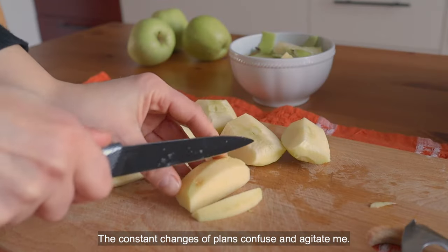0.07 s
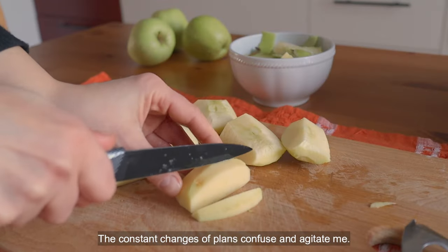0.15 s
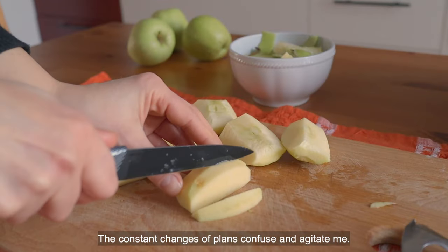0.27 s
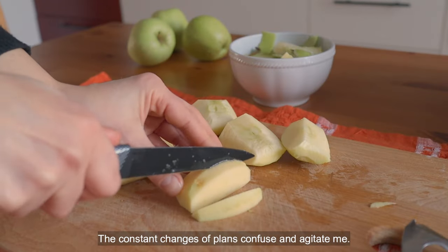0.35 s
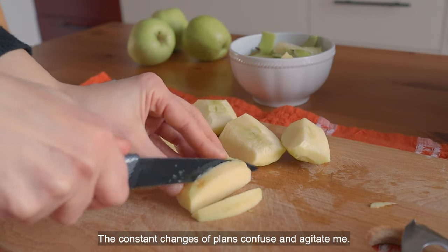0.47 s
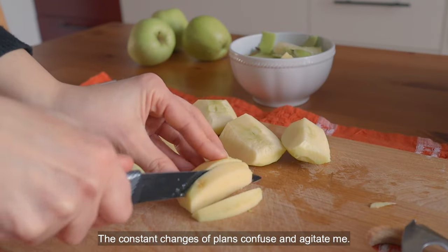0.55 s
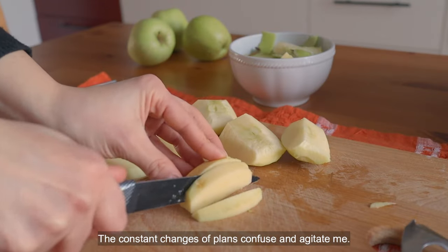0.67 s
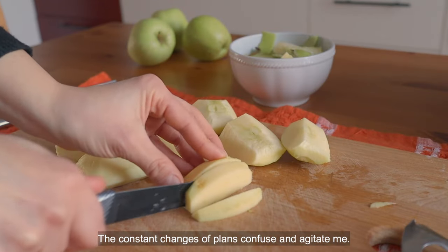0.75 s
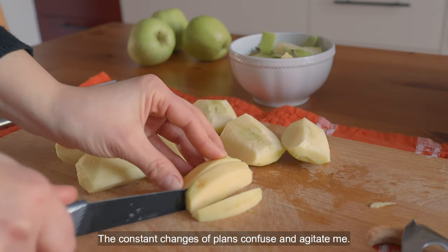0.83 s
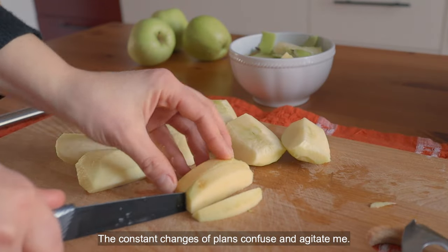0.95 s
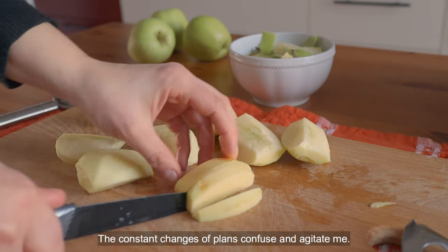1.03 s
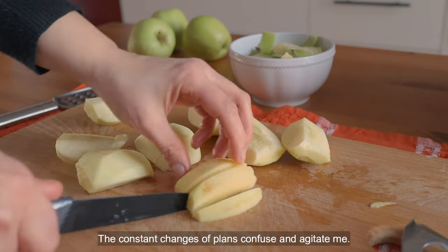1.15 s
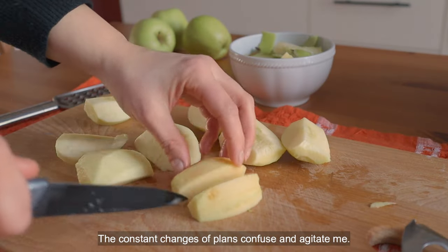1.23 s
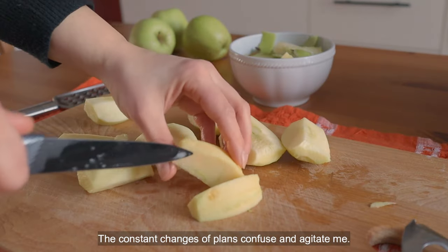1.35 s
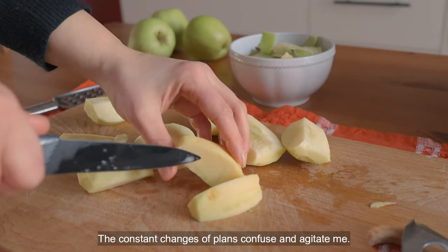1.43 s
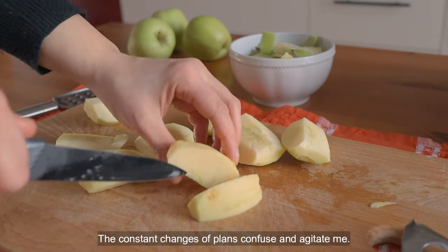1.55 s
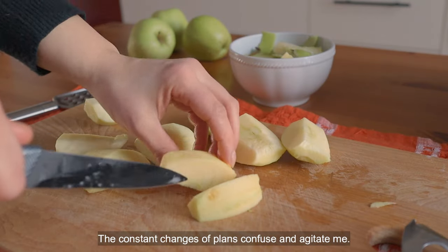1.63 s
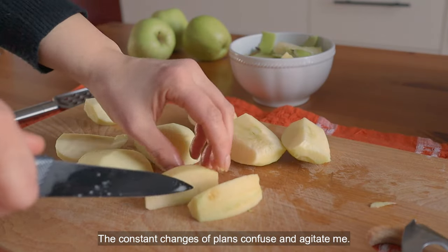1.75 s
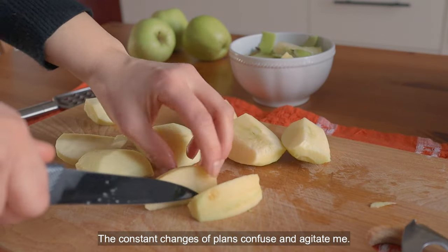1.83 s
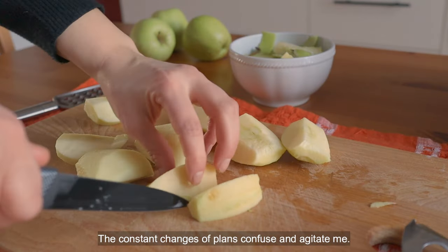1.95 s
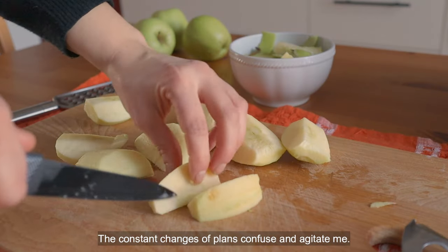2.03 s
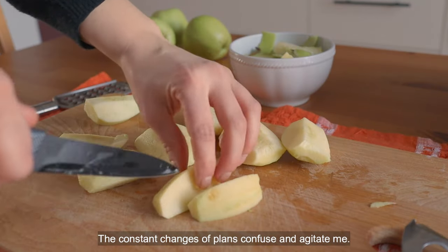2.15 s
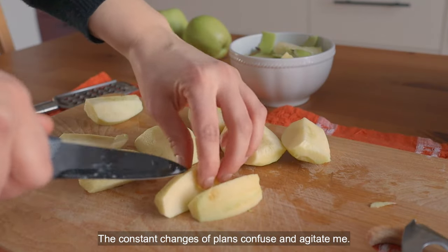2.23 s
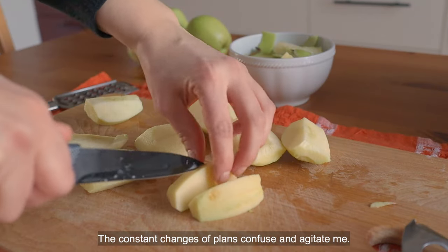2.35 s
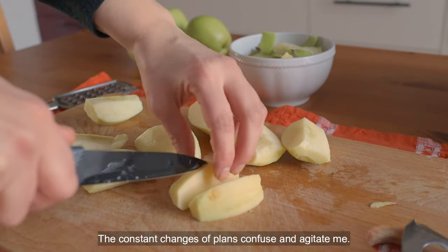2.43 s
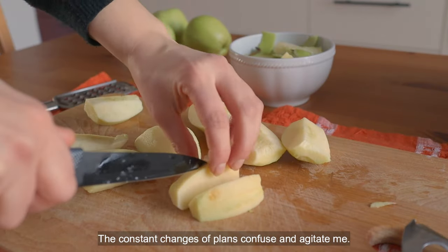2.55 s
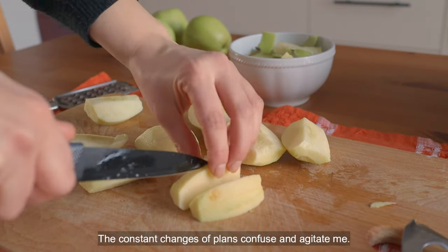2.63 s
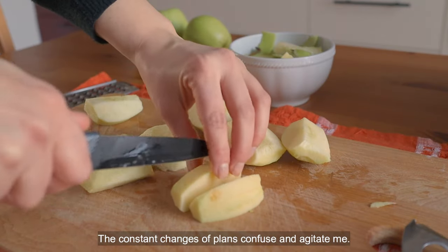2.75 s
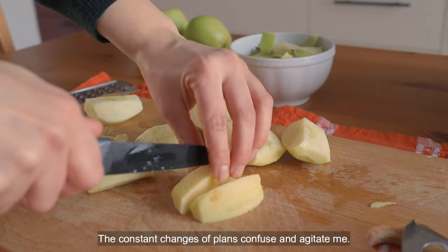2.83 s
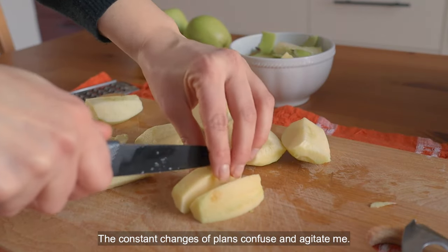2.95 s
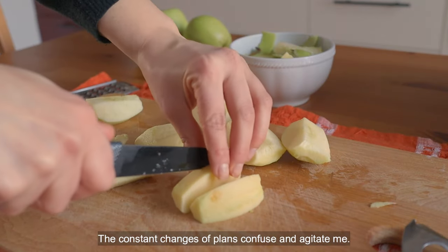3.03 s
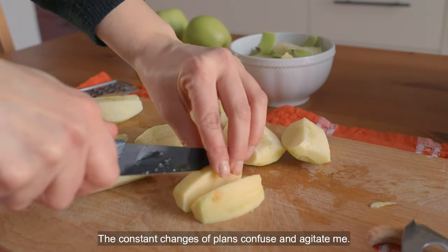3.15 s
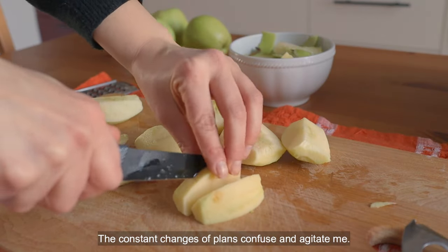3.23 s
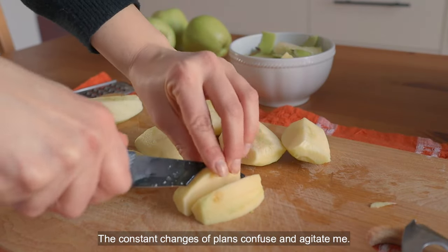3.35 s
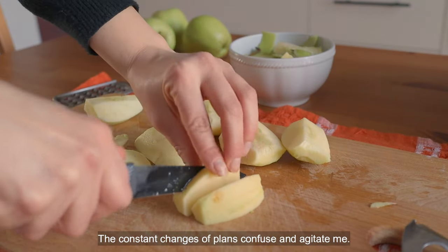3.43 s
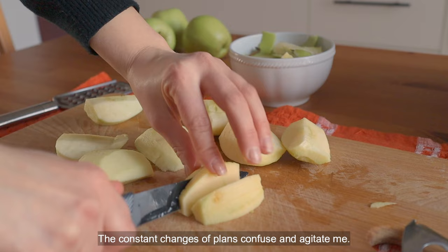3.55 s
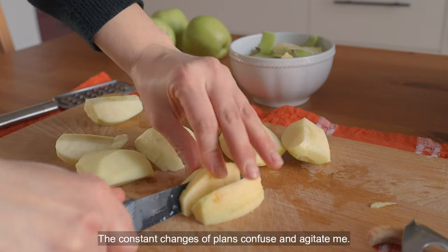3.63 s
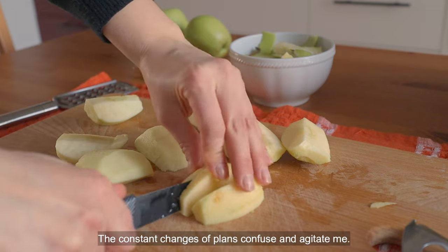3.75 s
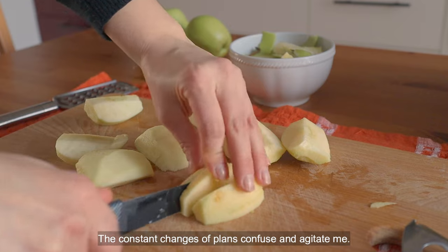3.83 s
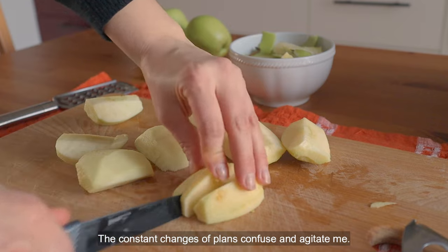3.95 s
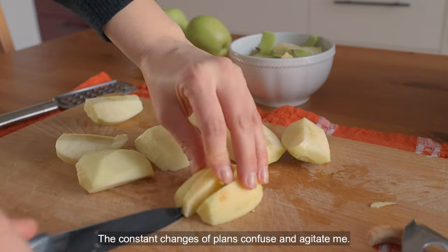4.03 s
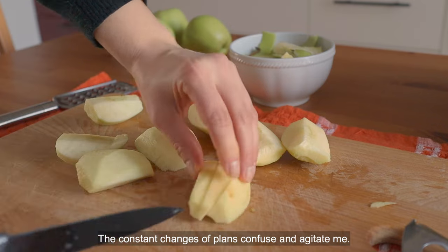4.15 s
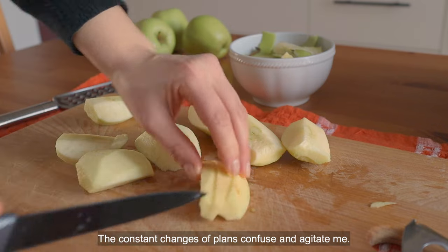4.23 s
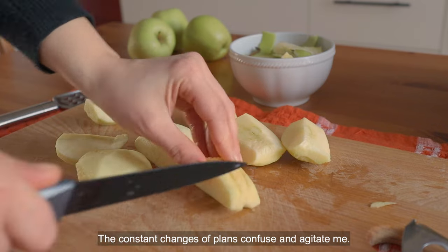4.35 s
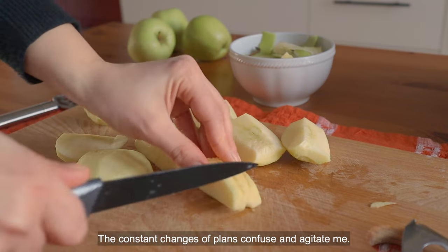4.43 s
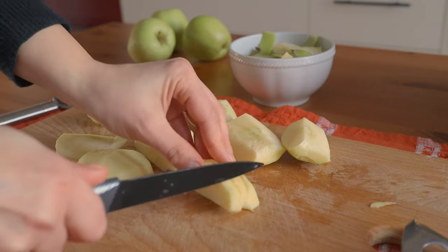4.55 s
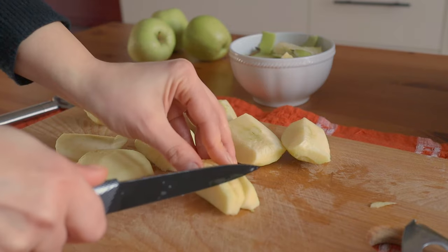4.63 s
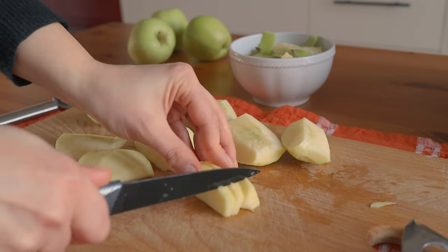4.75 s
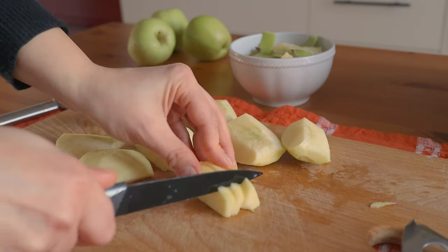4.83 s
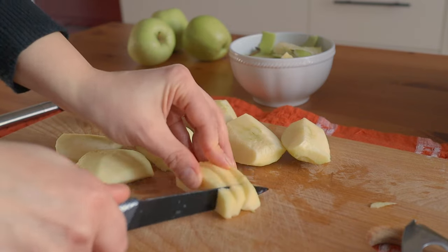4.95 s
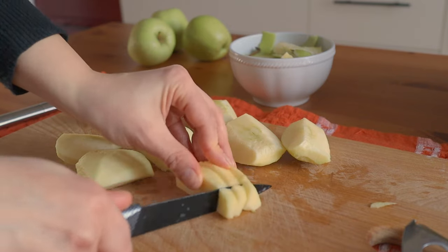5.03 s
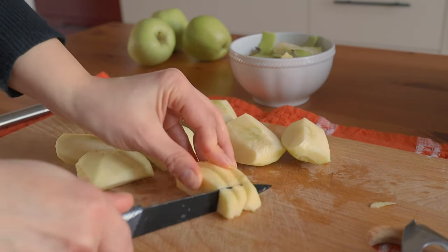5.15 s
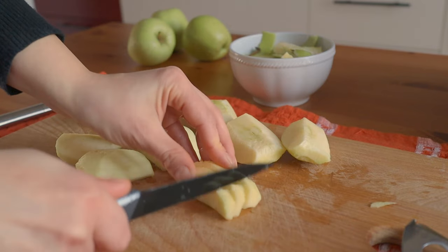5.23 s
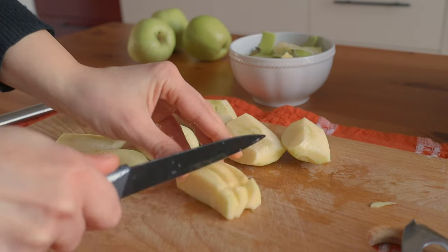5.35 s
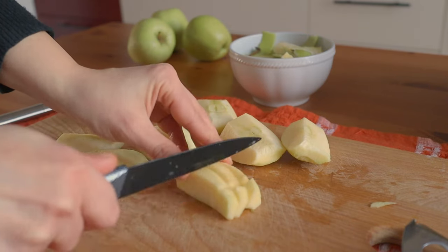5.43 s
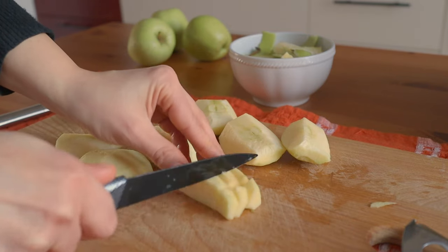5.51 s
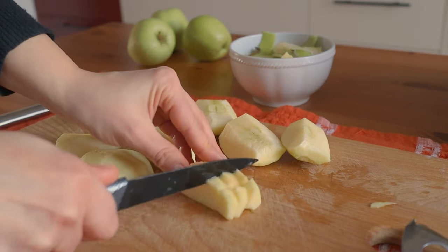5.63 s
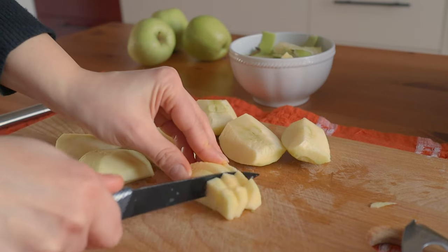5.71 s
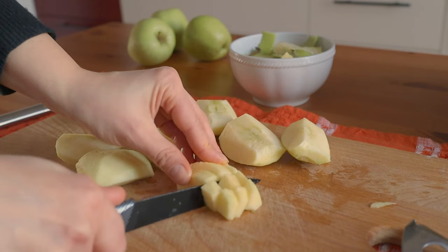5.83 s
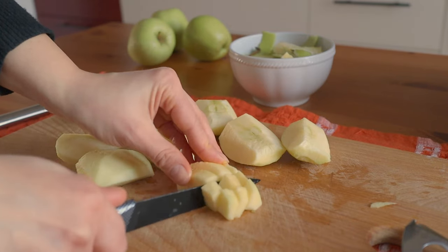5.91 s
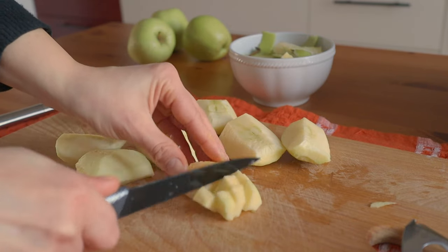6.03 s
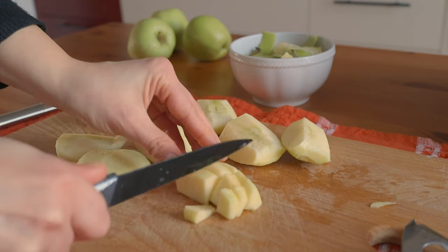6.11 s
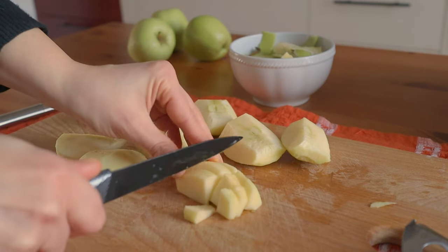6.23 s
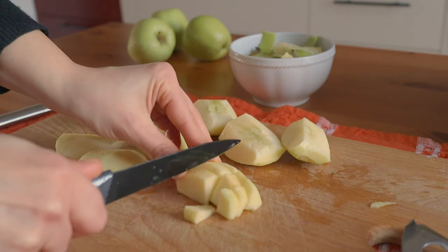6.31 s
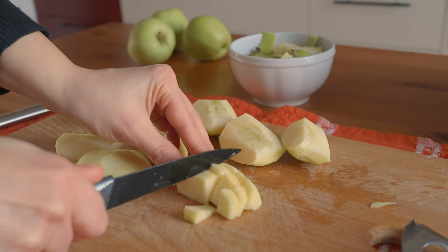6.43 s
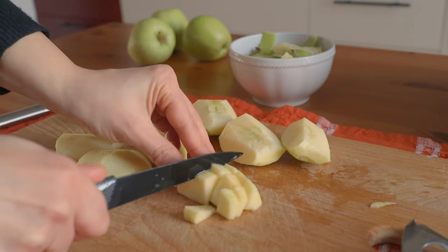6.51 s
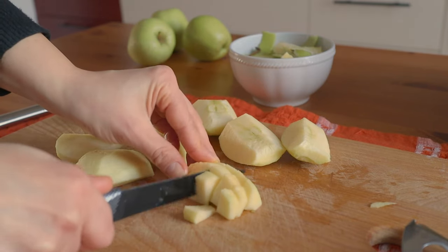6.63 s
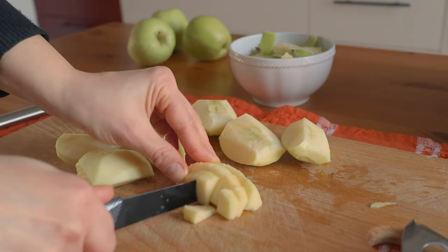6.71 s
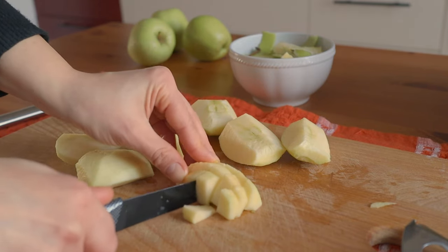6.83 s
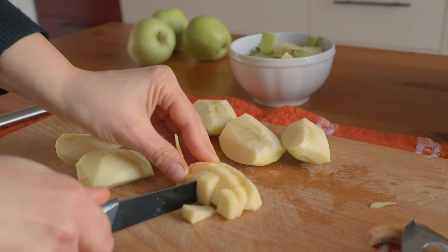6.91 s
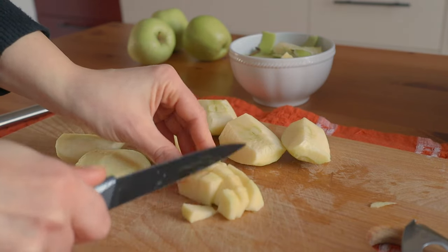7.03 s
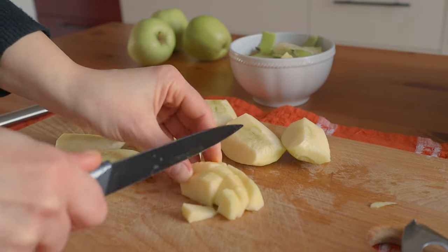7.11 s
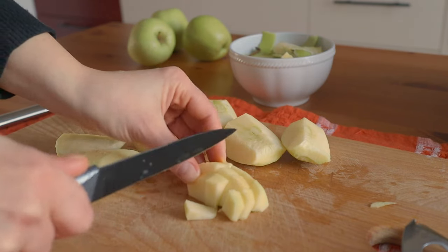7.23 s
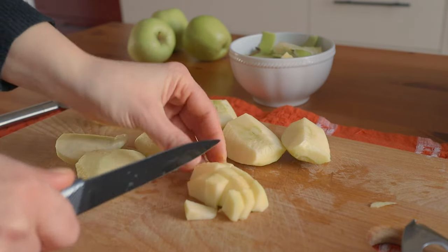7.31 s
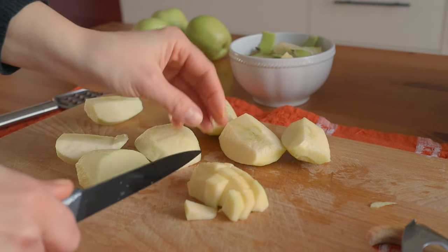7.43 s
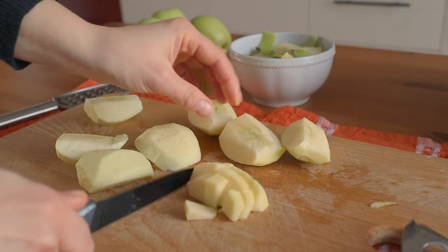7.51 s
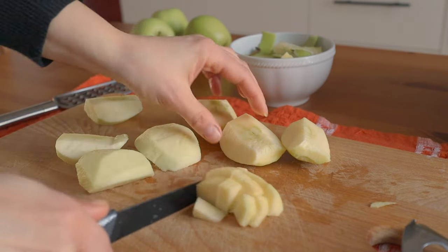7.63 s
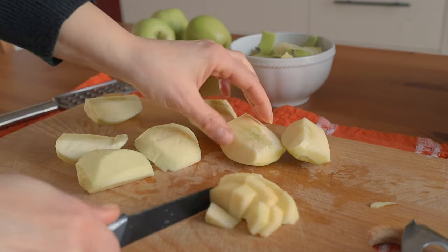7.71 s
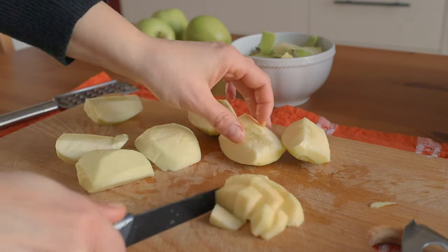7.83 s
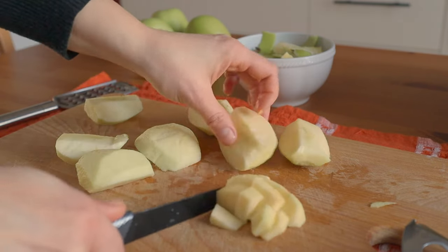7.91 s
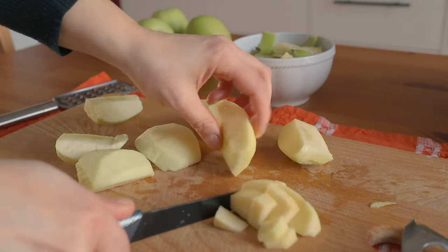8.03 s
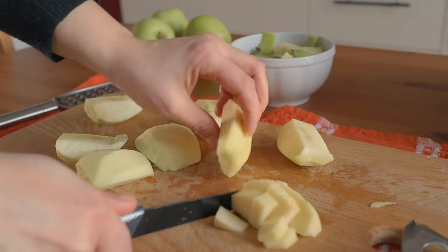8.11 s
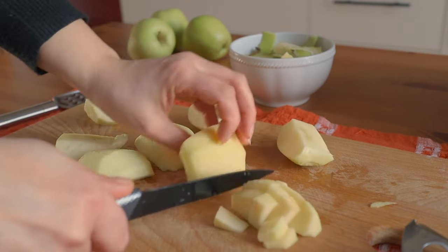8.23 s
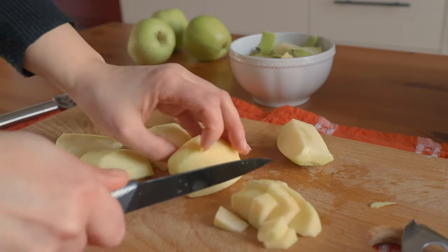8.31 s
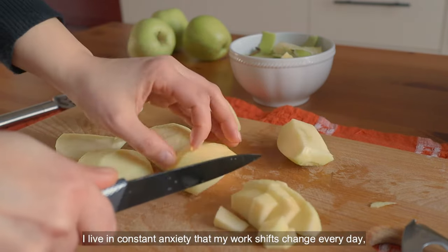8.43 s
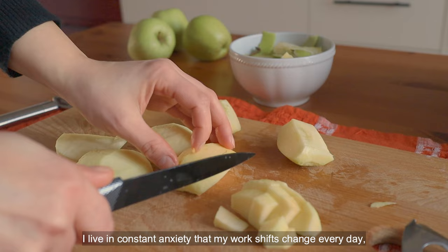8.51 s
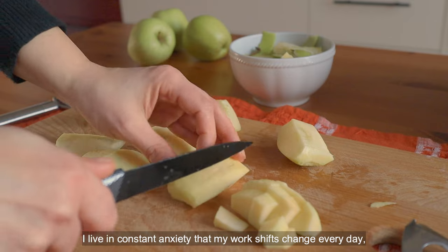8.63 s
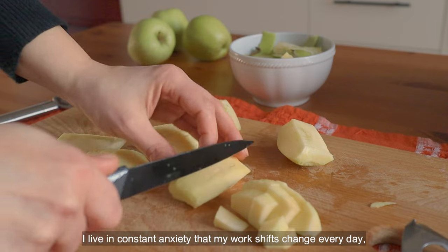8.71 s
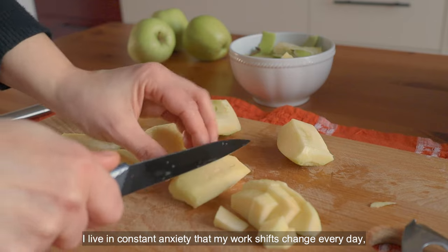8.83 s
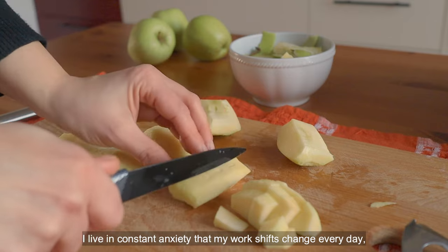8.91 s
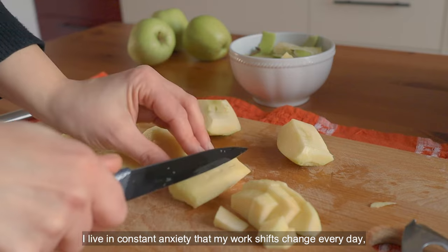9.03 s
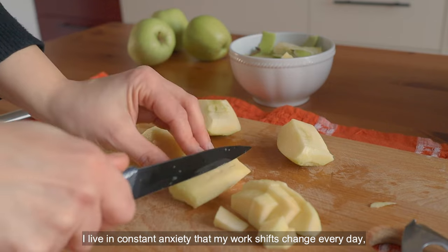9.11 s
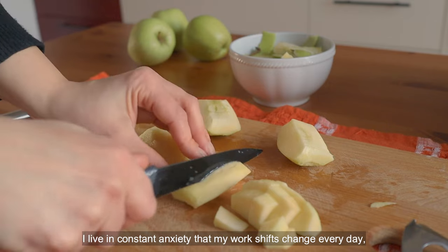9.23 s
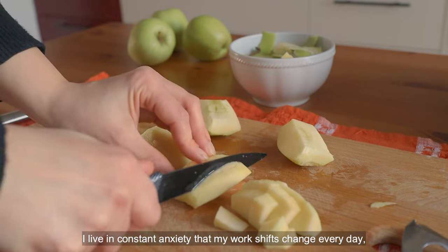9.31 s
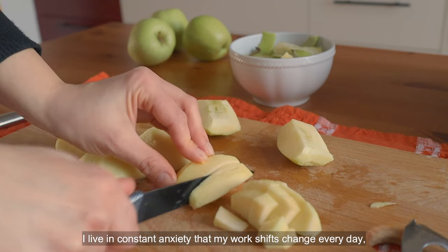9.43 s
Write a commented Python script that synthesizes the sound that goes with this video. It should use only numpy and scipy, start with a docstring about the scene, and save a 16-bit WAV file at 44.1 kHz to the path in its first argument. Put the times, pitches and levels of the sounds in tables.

```python
"""A kitchen knife slices apple on a wooden board in a bare, ringing kitchen, over a low hum and a thin whine.
Noise bursts in shaped strokes hiss through wet flesh, and a first chop, a pulse plus board modes, cracks early.
Fruit ticks, squeaks and knocks as a hand moves it; then three loud chops overload the recorder and duck its gain.
A softer chop follows, pieces are set down, and a last stroke hisses at the end."""
import sys
import numpy as np
from scipy import signal
from scipy.fft import rfft, irfft, next_fast_len
from scipy.io import wavfile
from scipy.ndimage import uniform_filter1d

SR = 44100
rng = np.random.default_rng(int(sys.argv[2]) if len(sys.argv) > 2 else 0)


def wav_record(signal):
    """Record a signal, one row per channel, as 16-bit PCM in the file named by sys.argv[1]."""
    frames = np.transpose(np.atleast_2d(signal))
    bounded = np.clip(frames, -1, 1)
    # unit amplitude maps onto the largest positive 16-bit level
    quanta = np.round(bounded * 32767).astype(np.int16)
    wavfile.write(sys.argv[1], SR, quanta)


N = 417186

# Reverberation of the kitchen: (frequency [Hz], t60 [s])
KITCHEN_DECAY = [(150, 0.92), (400, 0.8), (1000, 0.66), (2500, 0.72), (5000, 0.59), (9000, 0.58),
                 (15000, 0.047)]

# Spectrum of the steady air: (frequency [Hz], relative level [dB])
HUM_SPECTRUM = [(15, -46), (25, -72), (70, 0), (145, -4.5), (229, -0.5), (394, -10), (545, -5.5),
                (607, -14.5), (796, -12.5), (1890, -22.5), (3920, -25), (4250, -16), (4740, -24),
                (12900, -32.5), (16000, -33)]
HUM_DB = -56  # rms
# Humming bands: (frequency [Hz], width [Hz], rms level [dB])
HUM_BANDS = [(232, 63, -62), (293.7, 70, -64.5), (543, 19, -68), (836, 44, -72.5)]
WHINE_HZ, WHINE_DB = 4263, -69.5

# The table sways under the hands: (peak time [s], peak level [dB])
SWAYS = [(.6, -49.5), (1.88, -53.5), (3.32, -48.5), (3.76, -48.5), (5.08, -51.5), (5.9, -48.5), (6.8, -48),
         (8.07, -52.5), (8.441, -49), (8.59, -48.5), (9.42, -54.5)]
SWAY_REST_DB, SWAY_RISE_DB_PER_S, SWAY_FALL_DB_PER_S = -64.5, 70, 75

# Hands jolt the table: (time [s], level before rise and decay [dB], frequency [Hz])
THUDS = [(1.849, -36.5, 121), (3.715, -28, 98), (8.049, -31, 87.4), (8.319, -32.5, 94.6), (8.389, -29, 115)]

# A thin squeak: (start [s], length [s], start pitch [Hz], held pitch [Hz], settling time [s], peak level [dB])
WHISTLE = (4.32, .29, 5300, 5560, .06, -70.5)
# Wet squeaks and scuffs: (start [s], length [s], start pitch [Hz], end pitch [Hz], width [Hz], peak level [dB])
SQUEAKS = [(0.45, 0.21, 2495, 3380, 500, -53), (1.1, 0.37, 2790, 2720, 700, -64.5),
           (3.501, 0.19, 4010, 3740, 432, -52), (3.565, 0.19, 1700, 1800, 800, -53),
           (3.977, 0.24, 2190, 2046, 380, -51), (4.017, 0.182, 3750, 3670, 200, -58.5),
           (7.92, 0.055, 1300, 1300, 200, -50), (8.685, 0.096, 2050, 1980, 301, -59),
           (7.702, 0.17, 3300, 3220, 600, -54), (7.708, 0.18, 1400, 1295, 300, -52),
           (8.04, 0.17, 1350, 1305, 420, -52.5)]

# Wet flesh snaps or unsticks: (time [s], peak level [dB], pitch [Hz])
TICKS = [(0.247, -40, 2320), (0.388, -34.5, 2460), (0.408, -38, 2640), (1.298, -44, 2500),
         (1.351, -44.5, 900), (2.9463, -42, 2590), (3.1247, -42, 2710), (3.2936, -35, 2750),
         (3.8663, -42, 1890), (4.0057, -34.5, 2250), (4.452, -45, 1610), (4.5902, -40.5, 2470),
         (4.789, -47, 4350), (5.6126, -31.5, 3480), (5.667, -43.5, 2780), (6.4573, -36.5, 2514),
         (6.486, -41.5, 1735), (7.225, -47.5, 3276), (7.9232, -43, 1550), (8.332, -43, 2780),
         (8.3868, -40.5, 1616), (8.535, -45, 2600), (8.5557, -41, 1813), (8.835, -50, 2510),
         (9.0126, -37.5, 3160)]
TICK_SPREAD = 1.7  # the grit reaches this factor below and above its pitch
TICK_T60_S, TICK_SNAP_DB, TICK_RISE_S = 0.03, -12, 0.0014

# Spectrum of rubbed wet flesh, before its bands are balanced: (frequency [Hz], relative level [dB])
FLESH_SPECTRUM = [(380, -4), (600, -3), (1200, -8.5), (1700, -6), (2200, -0.5), (2650, 2.5), (3200, 0.5),
                  (4100, -1.5), (5000, -10.5), (6300, -11.5), (8200, -11), (10500, -17), (13000, -21.5),
                  (16000, -25)]
# Blade and fingers rub fruit and wood; a cut swells slowly and stops on the board:
# (peak time [s], rise [s], hold [s], fall [s], peak level [dB], treble level [dB], body level [dB])
# Treble and body are relative to the middle band.
STROKES = [(0.254, .015, 0.13, 0.062, -64, -3, -1), (0.552, 0.23, 0.1, 0.03, -42, -5.5, -1.5),
           (0.795, 0.14, 0.079, 0.31, -53, -6.5, -2.5), (1.289, 0.076, 0.0075, 0.13, -57, -15, 3),
           (1.437, 0.2, 0.1, .03, -62, -4, -4), (2.097, .06, 0.0056, 0.031, -57.5, -18, -12),
           (2.332, 0.014, 0.0082, 0.16, -52, -8.5, -6.5), (2.968, .015, 0.11, .05, -63, -4.5, -13),
           (3.136, 0.093, 0.014, 0.13, -53, -5, -2.5), (3.315, 0.01, 0.1, 0.034, -48, -2, -2.5),
           (3.578, 0.21, 0.081, 0.09, -47.5, -4.5, -2), (3.987, 0.23, 0.033, 0.44, -51.5, -8, -3),
           (4.38, 0.072, 0.04, 0.1, -61, -10, 2), (4.57, 0.087, 0.018, 0.3, -59.5, -8.5, -7),
           (4.854, 0.25, 0.059, .05, -58, -6.5, -8), (5.039, .16, 0.027, 0.011, -41, -5.5, -6),
           (5.628, .015, 0.16, 0.054, -64.5, -12.5, -6), (5.771, 0.11, 0.1, 0.022, -42, -6.5, -5),
           (6.49, 0.027, 0.028, 0.04, -51, -9.5, -2.5), (6.634, 0.14, 0.072, 0.026, -47.5, -6.5, -3),
           (6.706, 0.0094, 0.014, 0.033, -38, -4.5, -5.5), (6.747, .015, 0.0081, 0.016, -39, -3, -5.5),
           (7.768, 0.15, 0.055, 0.15, -50.5, -15, 2.5), (7.928, .015, .025, 0.028, -52, -4.5, -8),
           (8.088, 0.075, 0.044, 0.037, -48, -15, -0.5), (8.34, 0.18, 0.07, 0.055, -65.5, -6, 6),
           (8.703, 0.14, 0.042, 0.058, -56, -8.5, 2.5), (8.945, 0.027, .08, .12, -59, -10, -5.5),
           (9.337, 0.21, 0.051, 0.043, -44, -5.5, -2)]
STROKE_ENDS_DB, STROKE_ROUND, STROKE_EDGE_S = -25, 1.28, 0.006  # end level, roundness of top, softness of ends

# Apple pieces set down on the board:
# (time [s], first landing's peak [dB], nominal contact [ms], rebound share [0-1], room level [dB])
KNOCKS = [(1.817, -35, 1, 0, -1), (3.444, -34, 0.36, 0.7, -4), (4.005, -40, 0.18, 0, -7),
          (8.388, -36, 0.27, 0.2, -18), (8.5565, -20.5, 0.75, 0, -6.5)]
# Modes of a fruit piece: (frequency [Hz], relative level [dB], t60 [s])
FRUIT_MODES = [(244, 3, 0.015), (389, -1, 0.039), (490, 2, 0.015), (830, -1, 0.033), (1260, -8, 0.022)]

# Blade meets board:
# (time [s], first landing's peak [dB], nominal contact [ms], rebound share [0-1], room level [dB],
#  sheen of the steel [dB], pitch favoured by the spot struck [Hz], its lift in the room sound [dB])
CHOPS = [(0.6397, -8, 0.43, 0.8, -7.5, 0, 1800, 5), (5.0587, 11.5, 0.038, 0.55, -14.5, 3, 4150, 5),
         (5.8739, 11, 0.037, 0.55, -14.5, 3.5, 5550, 3), (6.7763, 9.5, 0.077, 0.9, -13.5, -0.5, 2950, 2.5),
         (7.6591, -17, 0.48, 0.64, -5, -3, 2105, 4)]
# Modes of the board, heard up close: (frequency [Hz], relative level [dB], t60 [s])
BOARD_MODES = [(525, -9, 0.004), (1000, -29, 0.0059), (1884, 10, 0.0054), (2433, 8, 0.0075),
               (2686, -1, 0.042), (3248, 6, 0.027), (4050, -0.5, 0.0085), (5620, 2.5, 0.0055),
               (6460, -5.5, 0.0055)]
# Spectrum a blow sends out: (frequency [Hz], relative level [dB])
CRACK_SPECTRUM = [(120, -54), (220, -11), (450, -1.5), (800, 3), (1250, -0.5), (1800, 2.5), (2450, 2.5),
                  (3400, -3), (4250, -5.5), (4850, -21), (5700, -11.5), (7000, -23.5), (9000, -33),
                  (14000, -51.5)]
REBOUND_S = 0.001712  # time between the two landings
SHEEN_HZ, SHEEN_WIDTH_HZ, SPOT_WIDTH_HZ = 7300, 1100, 220

EDGE_HZ = 15800  # upper band limit of the recorder


def gain_of(db):
    """Logarithmic level: decibels to amplitude ratio."""
    return 10 ** (np.asarray(db) / 20)


def evened(x):
    """Normalisation of power: scales to rms 1."""
    return x / np.sqrt(np.mean(x ** 2) + 1e-20)


def read(points, hz):
    """Interpolation of a (frequency, value) table on a logarithmic frequency axis."""
    table_hz, value = np.transpose(points)
    return np.interp(np.log(hz + 1), np.log(table_hz + 1), value)


def add(mix, s, sound):
    """Superposition: adds a sound into the mix at time s."""
    part = mix[round(s * SR):][:len(sound)]
    part += sound[:len(part)]


def coloured(x, points):
    """Linear filtering: multiplies the spectrum by a (frequency, dB) curve."""
    size = next_fast_len(len(x))
    hz = np.fft.rfftfreq(size, 1 / SR)
    return irfft(rfft(x, size) * gain_of(read(points, hz)), size)[:len(x)]


def band(x, lo_hz, hi_hz):
    """Band-pass filtering: one band at rms 1."""
    sos = signal.butter(3, [lo_hz, hi_hz], "band", fs=SR, output="sos")
    return evened(signal.sosfilt(sos, x))


def lifted(x, centre_hz, width_hz, db):
    """Resonant emphasis: raises or lowers one bell-shaped band."""
    hz = np.fft.rfftfreq(len(x), 1 / SR)
    bell = np.exp(-((hz - centre_hz) / width_hz) ** 2)
    return irfft(rfft(x) * gain_of(db * bell), len(x))


def fuzzy(hz, width, steady=0):
    """Modulation: slow complex noise plus a steady share on a carrier of pitch hz gives a narrow band, rms 1."""
    count, radius = len(hz), np.exp(-np.pi * width / SR)
    noise = rng.standard_normal(count) + 1j * rng.standard_normal(count)
    slow = signal.lfilter([1], [1, -2 * radius, radius * radius], noise)
    slow = slow / abs(slow).mean() + steady
    carrier = np.exp(2j * np.pi * np.cumsum(hz) / SR)
    return evened((slow * carrier).real)


def patchy(x, depth_db):
    """Random modulation: patches of pitch and time swell and fade as the contact wanders."""
    spectra = signal.stft(x, nperseg=512)[2]
    patches = uniform_filter1d(rng.standard_normal(spectra.shape), size=8, axis=0)
    patches = uniform_filter1d(patches, size=12, axis=1)
    return signal.istft(spectra * gain_of(depth_db * evened(patches)), nperseg=512)[1][:len(x)]


def kitchen(x):
    """Reverberation: sparse taps of random sign build up briefly, then each band decays at its own rate."""
    taps = np.zeros(SR)
    slots = np.arange(60, SR - 20, 12)
    taps[slots + rng.integers(0, 12, len(slots))] = rng.choice([-1., 1.], len(slots))
    hz, t, spectra = signal.stft(taps, SR, nperseg=256)
    decay = gain_of(-60 * t / read(KITCHEN_DECAY, hz)[:, None])
    tail = signal.istft(spectra * decay, SR, nperseg=256)[1][:SR]
    tail = tail * np.clip(np.arange(SR) / SR / 0.0063, 0, 1) ** 1.2
    return signal.fftconvolve(x, tail / np.linalg.norm(tail))[:N]


def hum():
    """Stationary noise: steady air with a few humming bands and a flickering whine."""
    out = gain_of(HUM_DB) * evened(coloured(rng.standard_normal(N), HUM_SPECTRUM))
    for hz, width, db in HUM_BANDS:
        out += gain_of(db) * fuzzy(np.full(N, hz), width)
    whine = fuzzy(np.full(N, WHINE_HZ), 40, steady=0.93)
    return out + gain_of(WHINE_DB) * whine


def sway():
    """Amplitude modulation: a low lumpy rumble swells with each push of the hands."""
    t, level = np.arange(N) / SR, gain_of(SWAY_REST_DB)
    for s, db in SWAYS:
        slope = np.where(t < s, SWAY_RISE_DB_PER_S, SWAY_FALL_DB_PER_S)
        level = np.maximum(level, gain_of(db - slope * abs(t - s)))
    return level * band(rng.standard_normal(N), 28, 85)


def thuds():
    """Damped oscillation: a few low cycles swell and die after each jolt."""
    t, out = np.arange(SR // 4) / SR, np.zeros(N)
    for s, db, hz in THUDS:
        rise = 1 - np.exp(-t / 0.0092)
        decay = gain_of(db - 740 * t)  # 740 dB per second
        add(out, s, decay * rise * np.sin(2 * np.pi * hz * t))
    return out


def whistle():
    """Exponential glide: a thin squeak climbs quickly and then holds its pitch."""
    s, length, start_hz, held_hz, settle_s, db = WHISTLE
    t, out = np.arange(0, length, 1 / SR), np.zeros(N)
    pitch = held_hz + (start_hz - held_hz) * np.exp(-t / settle_s)
    tone = fuzzy(pitch, 40, steady=1.3)
    add(out, s, gain_of(db) * np.sin(np.pi * t / length) * tone)
    return out


def squeaks():
    """Frequency glide: narrow fuzzy bands swell, slide in pitch and fade."""
    out = np.zeros(N)
    for s, length, start_hz, end_hz, width, db in SQUEAKS:
        u = np.linspace(0, 1, round(length * SR))
        tone = fuzzy(start_hz + (end_hz - start_hz) * u, width, steady=25 / width)
        add(out, s, gain_of(db) * np.sin(np.pi * u ** 0.53) * tone)
    return out


def ticks():
    """Impulsive release: a decaying burst of grit around the pitch of the piece, with a snap of treble."""
    t, out = np.arange(2000) / SR, np.zeros(N)
    for s, db, hz in TICKS:
        body = band(rng.standard_normal(len(t)), hz / TICK_SPREAD, hz * TICK_SPREAD)
        snap = band(rng.standard_normal(len(t)), 5500, 14000)
        burst = gain_of(-60 * t / TICK_T60_S) * (body + gain_of(TICK_SNAP_DB) * snap)
        burst = burst * np.minimum(t / TICK_RISE_S + 0.1, 1)
        add(out, s, gain_of(db) * burst / abs(burst).max())
    return out


def stroke(t, peak_s, rise_s, hold_s, fall_s):
    """Envelope: swells, holds and sinks with rounded shoulders and a definite start and stop."""
    before, after = (peak_s - t) / rise_s, (t - peak_s - hold_s) / fall_s
    off_peak = np.maximum(np.maximum(before, after), 0)
    ends = np.minimum((1 - before) * rise_s, (1 - after) * fall_s) / STROKE_EDGE_S + 1
    return gain_of(STROKE_ENDS_DB * off_peak ** STROKE_ROUND) * np.clip(ends, 0, 1)


def rubbing():
    """Stick-slip friction: cells of wet flesh burst in dense uneven clicks over a hiss, in clumps."""
    sizes = gain_of(2 * np.minimum(rng.exponential(1, N), 5))
    bursts = sizes * rng.standard_normal(N) * (rng.random(N) < 5000 / SR)  # about 5000 a second
    pops = 7 * rng.standard_normal(N) * (rng.random(N) < 90 / SR)  # about 90 a second
    hiss = rng.standard_normal(N)
    clumps = gain_of(1.4 * evened(uniform_filter1d(rng.standard_normal(N), size=400)))
    grain = coloured((evened(bursts) + pops + hiss) * clumps, FLESH_SPECTRUM)
    grain = patchy(grain, depth_db=2)
    body, mid, treble = band(grain, 380, 1500), band(grain, 1500, 5200), band(grain, 5200, 16000)
    out, t = np.zeros(N), np.arange(N) / SR
    for peak_s, rise_s, hold_s, fall_s, db, treble_db, body_db in STROKES:
        at = slice(max(round((peak_s - 1) * SR), 0), round((peak_s + 1) * SR))
        mix = mid[at] + gain_of(treble_db) * treble[at] + gain_of(body_db) * body[at]
        out[at] += gain_of(db) * mix * stroke(t[at], peak_s, rise_s, hold_s, fall_s)
    return out


def causal(points):
    """Minimum phase: the pulse of a given (frequency, dB) spectrum with its energy earliest."""
    log_gain = np.log(gain_of(read(points, abs(np.fft.fftfreq(4096, 1 / SR)))))
    phase = -signal.hilbert(log_gain).imag
    return np.fft.ifft(np.exp(log_gain + 1j * phase)).real[:2048]


def ring(modes):
    """Modal superposition: damped tones after a click, neighbours in opposite phase, peak 1."""
    t, tones = np.arange(2048) / SR, 0
    for k, (hz, db, t60) in enumerate(modes):
        tones = tones + (-1) ** k * gain_of(db - 60 * t / t60) * np.sin(2 * np.pi * hz * t)
    # small things send little bass
    tones = signal.sosfilt(signal.butter(2, 330, "high", fs=SR, output="sos"), tones)
    return tones / abs(tones).max()


def struck(body, contact_ms):
    """Convolution of a smooth contact force with a body's response: a longer contact is duller."""
    u = np.arange(900) / SR / (contact_ms / 1000 / (2 * np.pi))
    return np.pad(np.convolve(u ** 2 * np.exp(-u), body), (0, SR))


def blows(rows, near, far):
    """Impact and rebound: two landings up close; the room answers the first, a little duller."""
    out, gap = np.zeros(N), round(REBOUND_S * SR)
    for s, db, contact_ms, rebound, room_db, *blade in rows:
        first, sent = struck(near, contact_ms), struck(far, 1.3 * contact_ms)
        if blade:
            sheen_db, spot_hz, spot_db = blade
            first = lifted(first, SHEEN_HZ, SHEEN_WIDTH_HZ, sheen_db)
            sent = lifted(sent, SHEEN_HZ, SHEEN_WIDTH_HZ, sheen_db)
            sent = lifted(sent, spot_hz, SPOT_WIDTH_HZ, spot_db)
        direct = first + rebound * np.roll(first, gap)
        sent = sent * np.linalg.norm(first) / np.linalg.norm(sent)  # equal energy
        echoes = kitchen(sent)[:len(first)]
        add(out, s, gain_of(db) / abs(first).max() * (direct + gain_of(room_db) * echoes))
    return out


def knocks():
    """Modal excitation: apple pieces ring briefly as they are set down on the board."""
    fruit = ring(FRUIT_MODES)
    return blows(KNOCKS, fruit, fruit)


def chops():
    """Impact radiation: the blade sends out a crack, joined up close by the modes of the board."""
    crack = causal(CRACK_SPECTRUM)
    return blows(CHOPS, crack / abs(crack).max() + 1.5 * ring(BOARD_MODES), crack)


def scene():
    """Superposition of all sources in one channel; rubbing and ticks share the room."""
    small = rubbing() + ticks()
    background = hum() + sway() + thuds()
    handling = whistle() + squeaks() + small + gain_of(-9.5) * kitchen(small)
    return (background + handling + knocks() + chops())[None]


def record(dry):
    """Compression and saturation: gain falls soon after a loud blow and creeps back; peaks round off and clip."""
    power = signal.lfilter([0.012], [1, -0.988], dry[0] ** 2)
    power_db = 10 * np.log10(power + 1e-12)
    fall = np.arange(N) * 18 / SR  # the held level falls 18 dB a second
    held_db = np.maximum.accumulate(power_db + fall) - fall
    over_db = np.maximum(held_db + 16, 0)  # threshold -16 dB
    ducked = dry / gain_of(0.26 * over_db)
    rounded = 1.176 * np.tanh(ducked / 1.17)
    edge = signal.firwin(511, EDGE_HZ, window=("kaiser", 9), fs=SR)
    return np.clip(signal.oaconvolve(rounded, edge[None], "same"), -1, 1)


dry = scene()
out = record(dry)
wav_record(out)
```